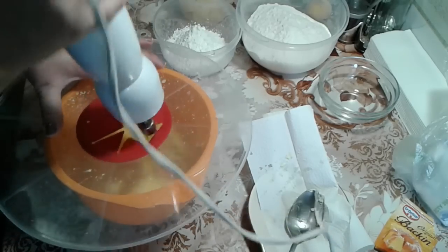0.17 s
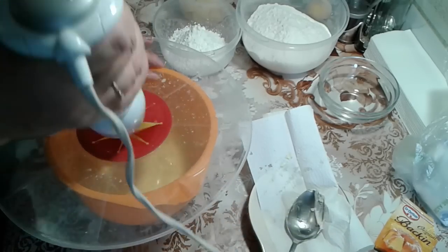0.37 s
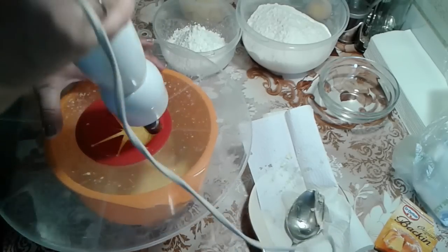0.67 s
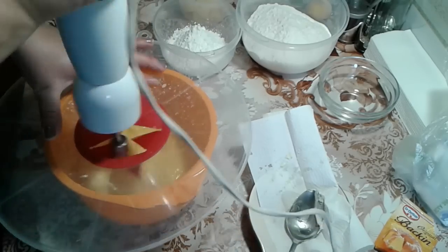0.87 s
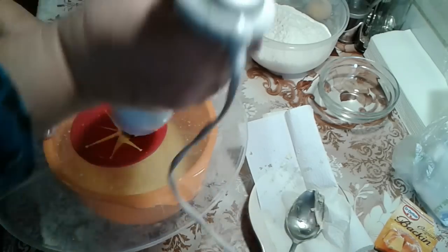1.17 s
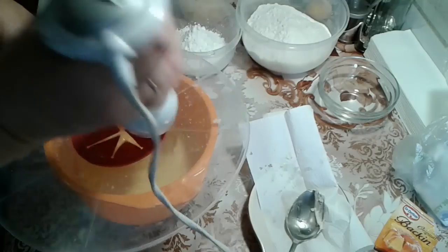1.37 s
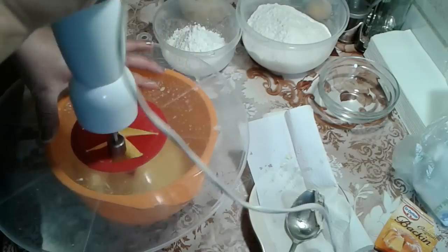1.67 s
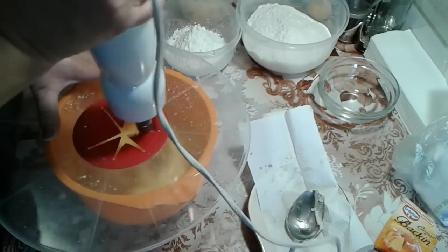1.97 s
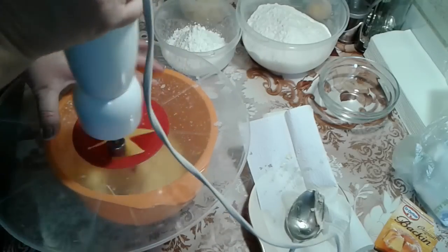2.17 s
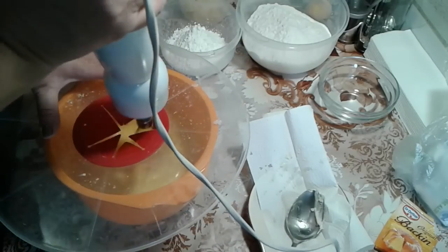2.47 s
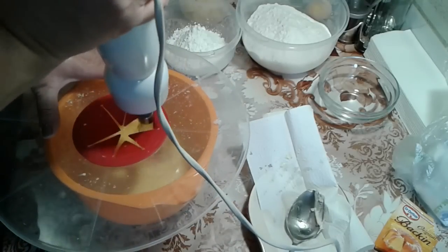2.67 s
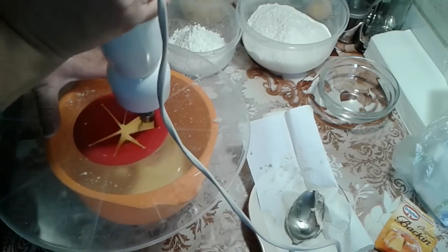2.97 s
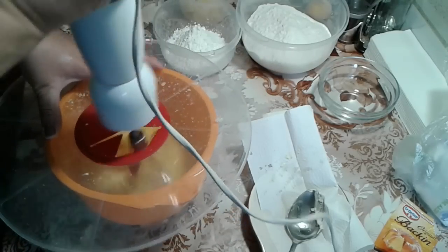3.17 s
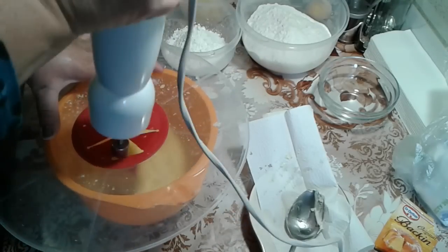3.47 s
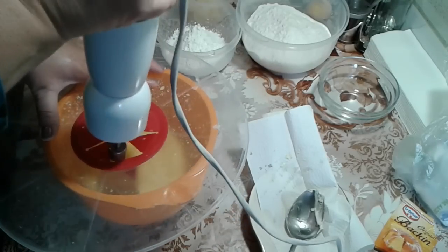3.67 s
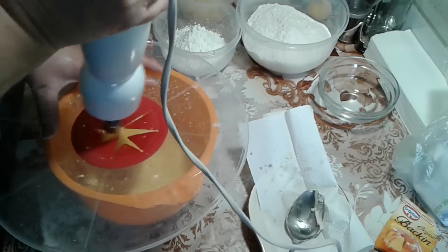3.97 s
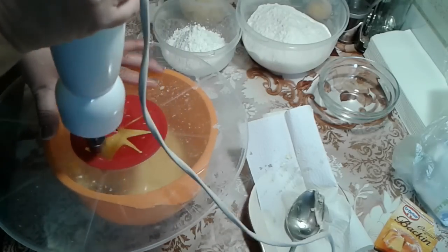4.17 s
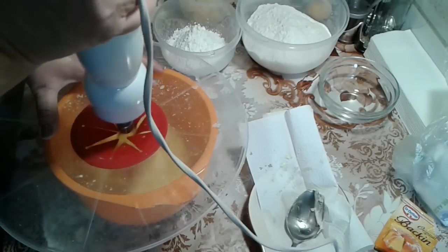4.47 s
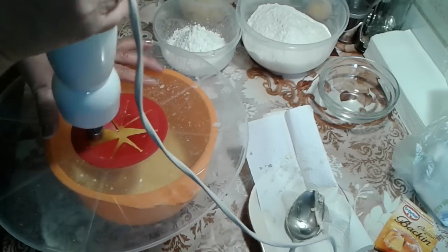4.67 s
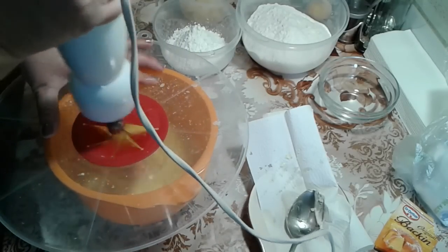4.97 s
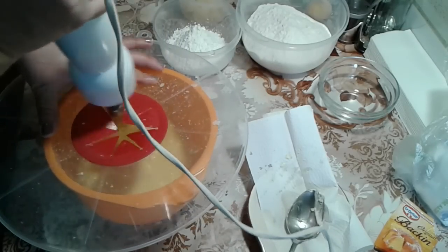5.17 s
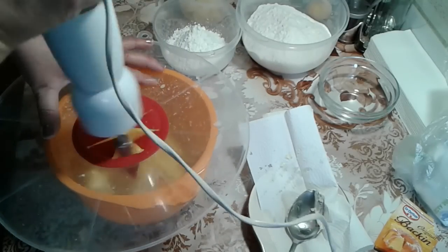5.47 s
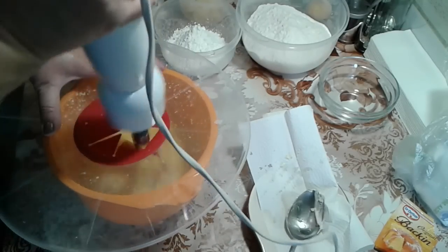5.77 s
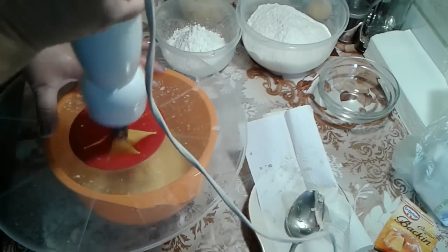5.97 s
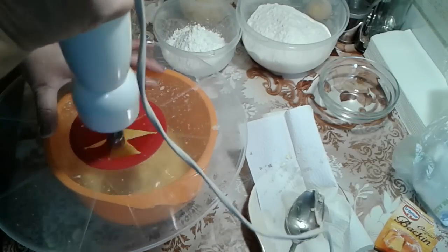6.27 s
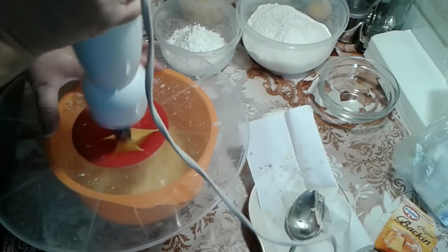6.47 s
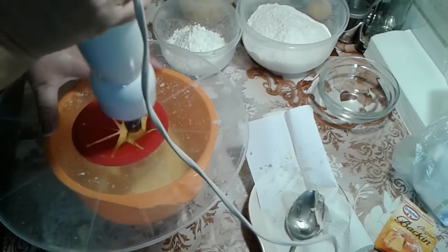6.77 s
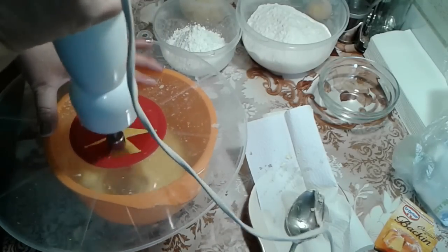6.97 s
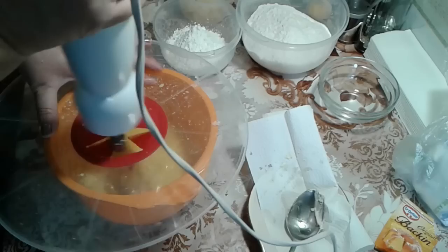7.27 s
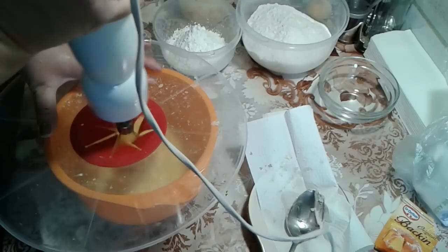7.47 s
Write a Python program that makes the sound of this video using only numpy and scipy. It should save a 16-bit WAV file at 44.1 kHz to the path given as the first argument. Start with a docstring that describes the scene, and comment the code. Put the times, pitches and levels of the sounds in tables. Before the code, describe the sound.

From 0 to about 7.6 seconds a handheld electric whisk runs without stopping, close to the microphone in a small kitchen with a short diffuse tail. Its strong bright hiss, centred in the high range, carries brush crackle, sliding rushes of air, a grainy rasp and a wavering gear whine; the speed sags slightly after 3.3 s. Beneath, thin batter churns, spatters and gurgles, swelling softly near 2 s, while the plastic bowl hums hollowly. Wires rattle on the wall near 0.5 and 1.3 s, then knock and clack in a cluster from 1.7 to 2.6 s. Contact is sparse until a hard burst at 4.0-4.2 s, followed by runs around 4.6, 5.1 and 5.8 s. From 6.2 s hits come more often, strong near 6.5, 6.9 and 7.2 s, with a final knock at 7.6 s. Faint deep thuds appear after 3.5 s.

```python
"""Electric whisk in a bowl

A handheld electric whisk runs at nearly one speed in a plastic bowl of thin batter, heard close in a kitchen.
Brush crackle and cooling air are shaped noise through the housing; gear and armature lines follow the shaft.
Random taps of the wires ring the bowl and wall modes; timed runs and blows on the wall rattle, knock and clack.
A short diffuse tail, soft low thuds of shaped noise and low room noise surround it."""
import sys
import numpy as np
from scipy import signal
from scipy.fft import rfft, irfft, next_fast_len
from scipy.io import wavfile
from scipy.ndimage import uniform_filter1d, map_coordinates

SR = 44100
rng = np.random.default_rng(int(sys.argv[2]) if len(sys.argv) > 2 else 0)


def master_out(mix):
    """Clip the mix to full scale and print it as 16-bit PCM to the path in sys.argv[1]."""
    frames = np.transpose(np.atleast_2d(mix))
    ceiling = np.clip(frames, -1, 1)
    pcm = np.round(ceiling * 32767).astype(np.int16)
    wavfile.write(sys.argv[1], SR, pcm)


N = 335601

# relative_db: shape or level before the later gains

# room noise: freq_hz, relative_db
ROOM_SPECTRUM = [(20, -17), (60, -1), (110, 9), (250, 17), (1000, -21)]
ROOM_DB, ROOM_T60_S, TOP_HZ = -55.5, 0.2, 15700
# soft low thuds: start_s, relative_db
SOFT_THUDS = [(3.53, -55), (4.13, -47), (4.63, -45.5), (5.03, -47), (5.73, -50), (6.17, -45), (7.21, -46),
              (7.56, -48)]
# thud colour: freq_hz, relative_db
THUD_SPECTRUM = [(20, -1), (45, 1), (110, 11), (250, -14), (800, -60)]

# motor shaft, slowed a little by the load: time_s, turns_per_s
SHAFT_SPEED = [(0, 145.7), (.8, 146.1), (1.1, 145.5), (1.5, 145.9), (1.9, 144.9), (2.6, 146), (3, 146.1),
               (3.4, 143.7), (5.2, 143.3), (5.7, 143.9), (6.3, 145), (6.7, 144), (7.61, 143.6)]
# brushes and air through the housing: freq_hz, relative_db
HOUSING_SPECTRUM = [(100, -37), (300, -17), (900, -17.5), (1400, -14), (2050, -7.5), (2500, -11),
                    (3200, -11.5), (3820, -8), (4080, -3.5), (5000, 0.5), (6100, -6.5), (6450, -11),
                    (8300, -18), (10000, -25), (12000, -37), (15500, -55)]
# narrow peaks in the hiss: centre_hz, width_hz, gain_db
HISS_PEAKS = [(2055, 45, 4.5), (2307, 29, 5.5), (2570, 30, 7.5), (3556, 39, 3), (3640, 22, -8),
              (4010, 28, 4.5), (4240, 32, 4), (4400, 60, 2), (4800, 48, 0.5), (5800, 81, 0),
              (6065, 110, 4.5)]
# brief dips of the hiss: centre_s, half_length_s, depth_db
HISS_LEVEL_DIPS = [(1.902, 0.051, 2), (4.16, 0.022, 4.5), (5.77, 0.08, 2.5), (6.147, 0.052, 1),
                   (6.718, 0.033, 2)]
HISS_START_DB, HISS_FALL_DB_PER_S = -19, 0.08
# air resonance at the vents, partly covered by the hand: time_s, centre_hz, relative_db
VENT_TRACK = [(0, 4230, -21), (.35, 4350, -30), (.6, 4440, -29), (1, 4240, -28), (1.3, 4140, -24),
              (1.55, 4150, -28), (2.25, 4250, -41), (2.88, 4390, -22), (3.15, 4610, -34), (3.6, 4880, -28),
              (4.4, 5120, -37), (5.2, 5310, -29), (5.7, 4830, -48), (6.1, 5070, -27), (6.6, 4700, -29),
              (7.1, 5180, -33), (7.61, 5060, -29)]
# rasp, coming and going: time_s, relative_db
RASP_LEVEL = [(0, -31), (.3, -32), (.42, -25), (.55, -36), (1.15, -33), (1.3, -33), (1.66, -30.5),
              (1.82, -42), (2.15, -28), (2.3, -44), (2.5, -31), (2.95, -31.5), (3.4, -37), (3.5, -43),
              (3.95, -37), (4.1, -28), (4.35, -44), (4.6, -29), (4.8, -32.5), (5.3, -33), (5.7, -37),
              (6.4, -35), (7.1, -41), (7.61, -40)]
# rasp colour: freq_hz, relative_db
RASP_SPECTRUM = [(1900, -23), (2500, 2), (3600, 6), (4300, -29)]
# armature lines: shaft_multiple, relative_db
ARMATURE_LINES = [(24, -44), (25, -45), (27, -43), (28, -35.5), (29, -35), (30, -39), (31, -39), (34, -35),
                  (35, -37), (36, -39), (38, -41), (40, -39), (41, -42), (42, -38.5)]
# gear lines, lower two then upper three: shaft_multiple, relative_db
GEAR_LINES = [(12, -12), (14, 0), (15, -2), (16, -12), (18, -11)]
# gear whine, varying as the grip turns: time_s, relative_db
WHINE_LEVEL = [(0, -27.5), (.25, -32), (.68, -45), (.8, -29), (.97, -29), (1.12, -25.5), (1.22, -34),
               (1.5, -42), (1.62, -33), (2.1, -34.5), (2.25, -30), (2.4, -31.5), (2.55, -32.5), (2.95, -31),
               (3.15, -40), (3.38, -37), (3.46, -29), (3.55, -51), (3.98, -50), (4.22, -31), (4.28, -28.5),
               (4.42, -28.5), (4.5, -45), (4.68, -34.5), (4.98, -28.5), (5.1, -43), (5.38, -38),
               (5.55, -34), (5.7, -28), (5.8, -39), (6.5, -34), (6.85, -34), (7.61, -36)]
# gain of the upper gear lines over the lower, varying with the grip: time_s, lean_db
GEAR_LEAN = [(0, 3), (.4, -9), (.8, -3), (.97, 6), (1.1, -9), (1.3, -2), (1.65, 3), (1.85, -3), (2.4, -3),
             (2.9, 1), (3.43, -4), (4, -1), (4.35, 1), (4.7, -6), (5.4, 0), (5.7, -8), (6, 8), (7.61, 2)]

# filled bowl: centre_hz, width_hz, relative_db
BOWL_MODES = [(175.4, 12.4, -21), (274, 14.7, -12), (349, 33, -8), (405.2, 31.3, 1.5), (463, 53, -4.5)]
# thin wall above the batter: centre_hz, width_hz, relative_db
WALL_MODES = [(655, 21, 2), (743, 44, -1), (854, 49, 3.5), (915, 65, 4), (1083, 87, 0), (1217, 22.5, 0.5),
              (1295, 114, -6.5)]
# steel wires, short clack: centre_hz, width_hz, relative_db
WIRE_MODES = [(1670, 130, 0), (1847, 110, 0), (2076, 110, 0), (2790, 250, -7), (3440, 300, -6)]
# drive of the wires digging into the batter: time_s, relative_db
DIG_DEPTH = [(0, -30.5), (.11, -35), (.17, -29.5), (.38, -28.5), (.56, -31), (.66, -55), (.83, -60),
             (.93, -26.5), (1.01, -33), (1.13, -28.5), (1.2, -28), (1.25, -37), (1.38, -37), (1.44, -46),
             (1.74, -44), (1.81, -28), (1.87, -34), (2.1, -31), (2.3, -29), (2.38, -28), (2.44, -23.5),
             (2.6, -34), (2.8, -32), (3.05, -33.5), (3.11, -39), (3.19, -38), (3.25, -29), (3.56, -28.5),
             (3.66, -34.5), (3.75, -34), (3.97, -33.5), (4.05, -23.5), (4.11, -31), (4.25, -38),
             (4.38, -31), (4.49, -32), (4.56, -28.5), (4.73, -29.5), (4.81, -36), (4.91, -35), (5.07, -30),
             (5.24, -31), (5.34, -25), (5.39, -41), (5.5, -24.5), (5.65, -26), (5.72, -37), (5.81, -19.5),
             (5.89, -36), (5.98, -26), (6.06, -29.5), (6.12, -33), (6.19, -26), (6.29, -35), (6.34, -23),
             (6.4, -30), (6.48, -25.5), (6.77, -27), (6.81, -30), (6.87, -24), (6.98, -18), (7.08, -26.5),
             (7.33, -26.5), (7.44, -27.5), (7.61, -29)]
# gurgle of folded-in air: freq_hz, relative_db
GURGLE_SPECTRUM = [(90, -56), (135, -12), (170, -2.5), (220, -5.5), (280, 0.5), (340, -3.5), (600, -42)]
# its one swell: centre_s, half_length_s, gain_db
GURGLE_RISE = (1.99, 0.29, 6.6)
# spatter drops: freq_hz, relative_db
DROP_SPECTRUM = [(350, -21.5), (520, 4), (1000, -3), (1400, -10.5), (2000, -5), (4000, -33)]
# wires clear in mid-bowl, spatter lulls: centre_s, half_length_s
SPATTER_LULLS = [(0.12, 0.082), (0.69, 0.045), (1.435, 0.035), (1.78, 0.057), (2.394, 0.059), (3.15, 0.031),
                 (4.38, 0.054), (5.37, 0.028), (5.715, 0.044), (6.1, 0.045), (7.118, 0.045)]
SPATTER_DB, NEAR_WALL_DB, LULL_DB, APPROACH_S = -33.5, 3, 5, 0.055
# runs along the wall: start_s, end_s, then relative boom_db, rock_db, knock_db, rattle_db
WALL_RUNS = [(0.483, 0.564, -36, -37, -31, -22), (0.845, 0.844, -52, -54, -29, -41),
             (1.294, 1.353, -36, -27, -28, -23.5), (1.657, 1.693, -34.5, -50, -48, -25),
             (1.795, 1.833, -26, -55, -46, -38), (1.906, 1.958, -30, -32, -29, -21),
             (2.006, 2.094, -48, -34, -30, -23), (2.114, 2.166, -20, -34, -34, -33),
             (2.23, 2.292, -21.5, -42, -38, -38), (2.464, 2.539, -21, -30.5, -27, -30),
             (2.573, 2.596, -42, -48, -34, -33), (3.284, 3.317, -23, -52, -35, -42),
             (4.016, 4.124, -24, -29.5, -22.5, -20), (4.14, 4.181, -33, -31, -31, -22),
             (4.524, 4.612, -26, -29.5, -25, -26), (4.645, 4.736, -23.5, -28, -24, -22),
             (4.965, 5.074, -29, -26, -24.5, -21), (5.141, 5.228, -24.5, -34, -24.5, -22),
             (5.594, 5.656, -24.5, -30, -50, -44), (5.773, 5.829, -21, -23, -25, -23),
             (6.172, 6.19, -28, -18, -20.5, -22), (6.32, 6.38, -24, -35, -42, -44),
             (6.505, 6.583, -23, -29.5, -24.5, -25), (6.635, 6.672, -24.5, -33, -23, -24.5),
             (6.829, 6.912, -24.5, -31.5, -22.5, -21.5), (6.932, 7.02, -29, -32, -27, -26),
             (7.212, 7.28, -20.5, -29, -25.5, -25), (7.29, 7.37, -23, -41, -30, -31),
             (7.567, 7.61, -27, -23, -19.5, -23.5)]
# wire rattle: freq_hz, relative_db
RATTLE_SPECTRUM = [(400, -59), (900, -2), (1400, 5), (1750, 10.5), (2200, 3.5), (2700, 6), (3600, 5),
                   (5500, 3), (8000, -34), (12000, -47)]
# single hard blows on the wall: start_s, then relative boom_db, knock_db, clack_db
WALL_BLOWS = [(.492, -20, -24, -30), (1.915, -36, -36, -21), (1.929, -24, -26, -15), (2.146, -31, -21, -32),
              (2.237, -18, -31, -35), (2.258, -19, -24, -32), (2.487, -21, -21, -21),
              (2.502, -22, -22, -24), (2.54, -21, -28, -36), (4.01, -31, -26, -29),
              (4.043, -16.5, -29, -31), (4.076, -23, -23, -24), (4.096, -36, -28, -22),
              (4.146, -22, -28, -15.5), (4.556, -26, -24, -32), (4.667, -20, -27, -38),
              (5.062, -18, -30, -29), (5.147, -18, -26, -23), (5.169, -36, -32, -22),
              (5.798, -16, -20, -23), (6.177, -23, -29, -25), (6.192, -17.5, -40, -41),
              (6.52, -18, -19.5, -19), (6.531, -16, -27, -29), (6.869, -18, -23, -21),
              (6.923, -26, -24, -35), (6.955, -19.5, -24, -33), (6.979, -24, -23, -35),
              (7.219, -23, -20, -23), (7.244, -20, -36, -34), (7.352, -22, -20, -28),
              (7.578, -24, -26, -25)]
BLOW_ATTACK_S = 0.001  # time constant


def amp(db):
    """Amplitude factor of a dB value."""
    return 10 ** (np.asarray(db) / 20)


def unit(x):
    """x at rms 1."""
    return x / np.sqrt(np.mean(x ** 2) + 1e-20)


def curves(rows):
    """One value per sample for each column after the time."""
    time_s, *columns = np.transpose(rows)
    return [np.interp(np.arange(N) / SR, time_s, column) for column in columns]


def wobble(rate):
    """Smooth random curve, rate knots per second."""
    at = np.arange(0, N + 16, 16)
    knots = rng.standard_normal(int(N * rate / SR) + 4)
    return np.interp(np.arange(N), at, map_coordinates(knots, [at * rate / SR]))


def bell(centre_s, half_length_s):
    """Smooth rise to 1 and fall around a moment."""
    return np.exp(-((np.arange(N) / SR - centre_s) / half_length_s) ** 2)


def taps(rate, scatter_db):
    """Tiny impacts, rate per second on average, at random moments with random size and sign."""
    count = int(rate * N / SR)
    size = amp(scatter_db * np.clip(rng.standard_normal(count), -2, 2))
    size = size * rng.choice([-1, 1], count)
    return np.bincount(rng.integers(0, N, count), size, N)


def filtered(x, response):
    """x through a complex response of frequency."""
    size = next_fast_len(N + SR // 2)
    return irfft(rfft(x, size) * response(np.fft.rfftfreq(size, 1 / SR)), size)[:N]


def coloured(x, spectrum):
    """x through (freq_hz, relative_db) points on a log axis, at rms 1."""
    freq_hz, db = np.transpose(spectrum)
    return unit(filtered(x, lambda hz: amp(np.interp(np.log(hz + 1), np.log(freq_hz + 1), db))))


def resonance(hz, centre_hz, width_hz):
    """Response of one damped mode, 1 at its centre."""
    return 1j * hz * width_hz / (centre_hz ** 2 - hz ** 2 + 1j * hz * width_hz)


def bandpass(x, low_hz, high_hz):
    """Third-order Butterworth band-pass."""
    return signal.sosfilt(signal.butter(3, [low_hz, high_hz], "bandpass", fs=SR, output="sos"), x)


def rung(x, modes, low_hz, high_hz):
    """x through a body's modes of alternating sign, radiating only between two edges, at rms 1."""
    def body(hz):
        return sum((-1) ** k * amp(db) * resonance(hz, centre_hz, width_hz)
                   for k, (centre_hz, width_hz, db) in enumerate(modes))
    return unit(bandpass(filtered(x, body), low_hz, high_hz))


def sustained(x, span_s):
    """Even feed of a driven mode: flatten the level, leaving only flutter quicker than the span."""
    window = np.hanning(int(2 * span_s * SR) + 3)
    power = np.abs(signal.fftconvolve(x ** 2, window / window.sum(), "same"))
    return unit(x / np.sqrt(power + 1e-9))


def patchy(x, depth_db):
    """Narrow bands of x swell and fade by themselves, as when a source moves among reflections."""
    bins = signal.stft(x, nperseg=1024)[2]
    field = uniform_filter1d(rng.standard_normal(bins.shape), size=3, axis=0)
    field = uniform_filter1d(field, size=12, axis=1)
    return signal.istft(bins * amp(depth_db * unit(field)), nperseg=1024)[1][:N]


def sloshed(x, drift, rate=9):
    """Moving batter loads the bowl unevenly, so its pitch drifts up and down."""
    speed = 1 + drift * wobble(rate)
    place = np.cumsum(speed) / speed.mean()
    return map_coordinates(x, [place], mode="nearest")


def struck(modes, t, scatter_db=2, detune=0.014):
    """One blow on a body's modes, at rms 1 over its first 20 ms; strengths and pitches vary per blow."""
    ring = 0
    for hz, width_hz, db in modes:
        size = amp(db + scatter_db * rng.standard_normal()) * rng.choice([-1, 1])
        pitch_hz = hz * (1 + detune * rng.standard_normal())
        ring = ring + size * np.exp(-np.pi * width_hz * t) * np.sin(2 * np.pi * pitch_hz * t)
    return ring / np.sqrt(np.mean(ring[:SR // 50] ** 2))


def room_noise():
    """Steady low noise of the kitchen."""
    return amp(ROOM_DB) * coloured(rng.standard_normal(N), ROOM_SPECTRUM)


def kitchen(x, wet_db=-10):
    """Short diffuse tail of table and walls; overlapping stretches meet new tails as the hand moves."""
    t = np.arange(int(ROOM_T60_S * SR)) / SR
    hop = SR // 4
    window = np.sqrt(np.hanning(2 * hop))
    wet = np.zeros(N + 2 * SR)
    padded = np.pad(x, (hop, 2 * hop))
    for i in range(0, N + hop, hop):
        tail = rng.standard_normal(len(t)) * amp(-60 * t / ROOM_T60_S)
        answer = signal.fftconvolve(padded[i:i + 2 * hop] * window, tail / np.linalg.norm(tail))
        wet[i:i + len(answer)] += answer
    return (x + amp(wet_db) * wet[hop:hop + N]) / np.hypot(1, amp(wet_db))


def thuds(rise_s=0.026, level_db=-3):
    """Soft, deep thuds of low noise, each a smooth rise and slower fall."""
    t = np.arange(N) / SR
    envelope = 0
    for start_s, db in SOFT_THUDS:
        age = np.maximum(t - start_s, 0) / rise_s
        envelope = envelope + amp(db) * age * np.exp(1 - age)
    return amp(level_db) * envelope * coloured(rng.standard_normal(N), THUD_SPECTRUM)


def shaft(flutter=0.001586):
    """Angle of the motor shaft; the load makes its speed flutter."""
    speed, = curves(SHAFT_SPEED)
    return 2 * np.pi * np.cumsum(speed * (1 + flutter * wobble(25))) / SR


def shaft_lines(angle, orders, waver_db):
    """Sines on multiples of the shaft speed, each wavering by itself."""
    return sum(amp(db + waver_db * wobble(14)) * np.sin(round(k) * angle + rng.uniform(0, 2 * np.pi))
               for k, db in orders)


def hiss(angle, pulsing=0.042, crackle=0.51, flutter_db=1.07, sway_db=0.1, patch_db=1.5):
    """Air and brush crackle, stronger once a turn, ring the housing; the level sways with the hand."""
    db = HISS_START_DB - HISS_FALL_DB_PER_S * np.arange(N) / SR + sway_db * wobble(13)
    db = db - sum(depth_db * bell(s, half_length_s) for s, half_length_s, depth_db in HISS_LEVEL_DIPS)
    air = rng.standard_normal(N) + crackle * unit(taps(rate=4000, scatter_db=3.5))
    air = air * (1 + pulsing * np.cos(angle)) * amp(flutter_db * wobble(45))

    def housing(hz):
        return np.prod([1 + (amp(gain_db) - 1) * resonance(hz, centre_hz, width_hz)
                        for centre_hz, width_hz, gain_db in HISS_PEAKS], axis=0)
    return amp(db) * coloured(filtered(patchy(air, patch_db), housing), HOUSING_SPECTRUM)


def vent(knots_per_s=330, level_db=-2):
    """A band of rushing air that slides as the grip turns: two random curves on a gliding carrier."""
    hz, db = curves(VENT_TRACK)
    phase = 2 * np.pi * np.cumsum(hz) / SR
    band = wobble(knots_per_s) * np.cos(phase) + wobble(knots_per_s) * np.sin(phase)
    return amp(db + level_db) * unit(band)


def rasp(level_db=-1):
    """Grainy rasp pitched just below the hiss: coloured random taps."""
    db, = curves(RASP_LEVEL)
    return amp(db + level_db) * coloured(taps(rate=2500, scatter_db=2.0), RASP_SPECTRUM)


def armature(angle, waver_db=3.0, level_db=1):
    """The armature's high lines glint inside the hiss."""
    return amp(level_db) * shaft_lines(angle, ARMATURE_LINES, waver_db)


def whine(angle, waver_db=2.0, rough=0.33, mesh_hz=2100, stage_width_hz=220, level_db=-1):
    """Gear lines on shaft multiples over a narrow rasp of the teeth, noise through two equal resonances."""
    db, = curves(WHINE_LEVEL)
    lean_db, = curves(GEAR_LEAN)
    lower = shaft_lines(angle, GEAR_LINES[:2], waver_db)
    upper = shaft_lines(angle, GEAR_LINES[2:], waver_db)
    lines = (lower + amp(lean_db) * upper) / np.hypot(1, amp(lean_db))
    teeth = filtered(rng.standard_normal(N), lambda hz: resonance(hz, mesh_hz, stage_width_hz) ** 2)
    return amp(db + level_db) * (unit(lines) + rough * unit(teeth))


def gurgle(level_db=-42.5, grows=0.44, bubbling_db=2):
    """Air folded into the batter gurgles low, a little louder as the wires dig deeper."""
    depth_db, = curves(DIG_DEPTH)
    centre_s, half_length_s, swell_db = GURGLE_RISE
    db = level_db + grows * (depth_db - depth_db.mean())
    db = db + swell_db * bell(centre_s, half_length_s) + bubbling_db * wobble(25)
    return amp(db) * coloured(taps(rate=840, scatter_db=3.0), GURGLE_SPECTRUM)


def hum(pitch_hz=405, drift=0.01001, flutter=0.02306, level_db=-2):
    """Stirring keeps the bowl's main mode singing, louder with depth; moving batter bends its pitch."""
    depth_db, = curves(DIG_DEPTH)
    bend = 1 + drift * wobble(4) + flutter * wobble(45)
    phase = 2 * np.pi * np.cumsum(pitch_hz * bend) / SR
    waver_db = 4.5 * np.clip(wobble(45), -2.5, 1)
    return amp(depth_db + level_db) * unit(amp(waver_db) * np.sin(phase))


def churn(slosh_db=2.0, swell_db=0.5, boom_db=-3, splash_grows=0.15, drop_share=0.76):
    """Wires slap the batter in uneven surges: the bowl booms with depth, spatter rises near the wall."""
    depth_db, = curves(DIG_DEPTH)
    near_wall = np.max([bell((start_s + end_s) / 2, (end_s - start_s) / 2 + APPROACH_S)
                        for start_s, end_s, *_ in WALL_RUNS], axis=0)
    splash_db = SPATTER_DB + NEAR_WALL_DB * near_wall + splash_grows * (depth_db - depth_db.mean())
    splash_db = splash_db - LULL_DB * sum(bell(s, half_length_s) for s, half_length_s in SPATTER_LULLS)
    bowl_db = depth_db + boom_db + swell_db * wobble(16)
    bowl = rung(taps(rate=730, scatter_db=4.0), BOWL_MODES, low_hz=294.0, high_hz=710)
    bowl = sloshed(sustained(bowl, span_s=0.04), drift=0.00788)
    wall = rung(taps(rate=900, scatter_db=-0.5), WALL_MODES, low_hz=476, high_hz=1590)
    drops = coloured(taps(rate=1400, scatter_db=2), DROP_SPECTRUM)
    surge = unit(amp(slosh_db * wobble(40)))
    return surge * (amp(bowl_db) * bowl + amp(splash_db) * unit(wall + drop_share * drops))


def scrapes(edge_s=0.0071, sag_db=0.5, chatter_db=4.5, noise_share=1.13,
            boom_db=-2.5, rock_db=-2.0, knock_db=-4.0, rattle_db=-1.3):
    """Wires strike the wall in quick runs: the bowl booms and rocks, its wall knocks, the wires rattle."""
    t = np.arange(N) / SR
    pressure = np.zeros((4, N))
    for start_s, end_s, *db in WALL_RUNS:
        # hardest bite first, then riding off the wall
        full_s = start_s + edge_s
        corners_s = [start_s - edge_s, full_s, max(end_s - edge_s, full_s), end_s + 4 * edge_s]
        contact = np.interp(t, corners_s, [0, amp(sag_db / 2), amp(-sag_db / 2), 0])
        pressure += amp(db)[:, None] * contact
    chatter = unit(amp(chatter_db * np.clip(wobble(100), -2, 1)))  # skips and bites again
    strikes = unit(chatter * taps(rate=900, scatter_db=1.0))
    boom = sustained(rung(strikes, BOWL_MODES, low_hz=323, high_hz=615), span_s=0.043)
    # a push on the wall rocks the whole bowl in its lowest modes
    rock = sustained(rung(strikes, BOWL_MODES, low_hz=183, high_hz=304.0), span_s=0.028)
    knock = sustained(rung(strikes, WALL_MODES, low_hz=490, high_hz=1710), span_s=0.012)
    rattle = coloured(strikes + noise_share * chatter * rng.standard_normal(N), RATTLE_SPECTRUM)
    gains = amp([boom_db, rock_db, knock_db, rattle_db])[:, None]
    return np.sum(pressure * gains * [boom, rock, knock, rattle], axis=0)


def knocks(next_wire_s=0.005, timing_scatter=0.148, loss_db=1.0, crack=0.46, crack_s=0.003,
           low_hz=210, high_hz=5000, level_db=-1.74):
    """Three wires in a row catch the wall hard: the bowl booms once, the wall knocks and steel clacks."""
    t = np.arange(SR // 4) / SR
    attack = 1 - np.exp(-t / BLOW_ATTACK_S)
    out = np.zeros(N + SR)
    shares = amp(-loss_db * np.arange(3))
    shares = shares / np.linalg.norm(shares)
    for start_s, boom_db, knock_db, clack_db in WALL_BLOWS:
        out[round(start_s * SR):][:len(t)] += amp(boom_db) * struck(BOWL_MODES, t) * attack
        for k, share in enumerate(shares):
            clack = struck(WIRE_MODES, t) + crack * np.exp(-t / crack_s) * rng.standard_normal(len(t))
            blow = amp(knock_db) * struck(WALL_MODES, t) + amp(clack_db) * clack
            moment_s = start_s + k * next_wire_s * (1 + timing_scatter * rng.standard_normal())
            out[round(moment_s * SR):][:len(t)] += share * attack * blow
    return amp(level_db) * bandpass(out[:N], low_hz, high_hz)


def scene():
    """Motor and bowl in the kitchen, the same on both channels."""
    angle = shaft()
    motor = hiss(angle) + vent() + rasp() + armature(angle) + whine(angle)
    bowl = gurgle() + hum() + churn() + scrapes() + knocks()
    mono = room_noise() + thuds() + kitchen(motor + bowl)
    return np.array([mono, mono])


def record(dry):
    """Sharp band limit: nothing passes from TOP_HZ up."""
    return np.array([filtered(channel, lambda hz: hz < TOP_HZ) for channel in dry])


dry = scene()
out = record(dry)
master_out(out)
```